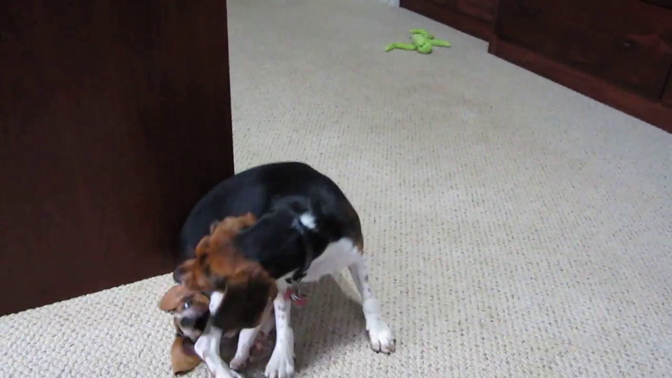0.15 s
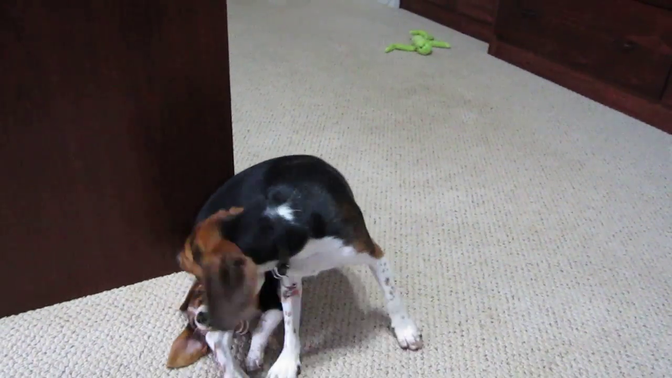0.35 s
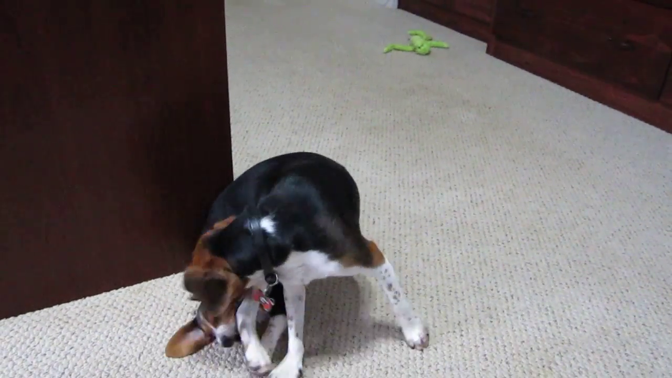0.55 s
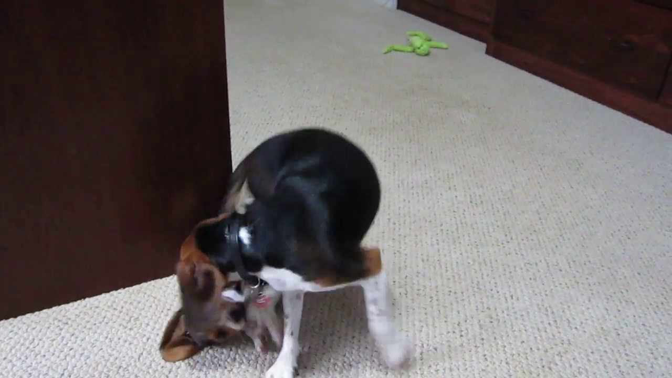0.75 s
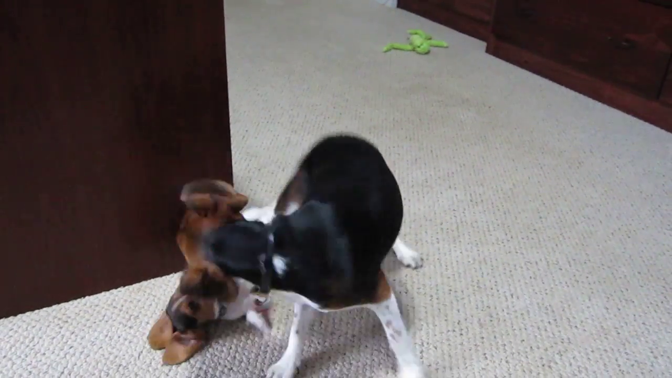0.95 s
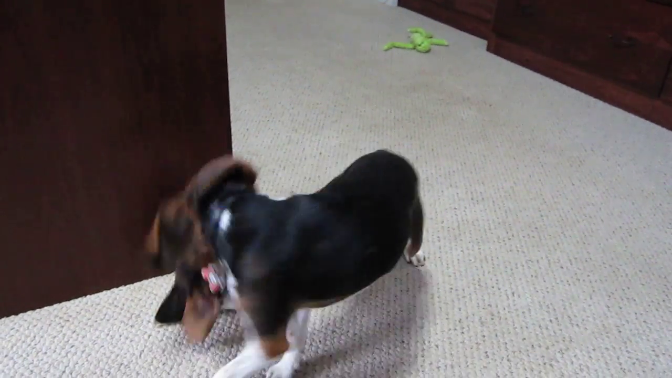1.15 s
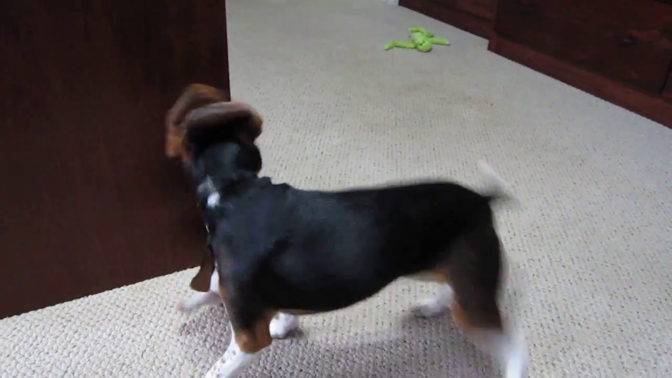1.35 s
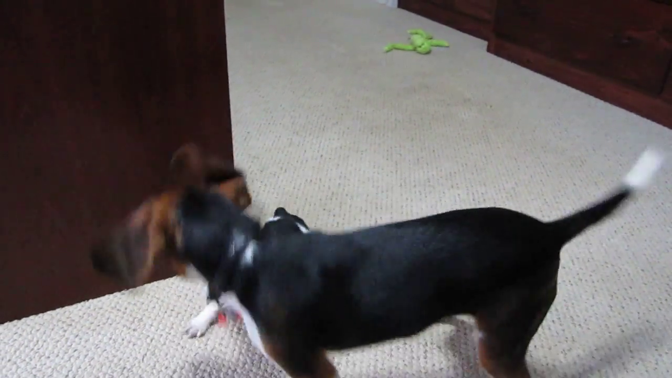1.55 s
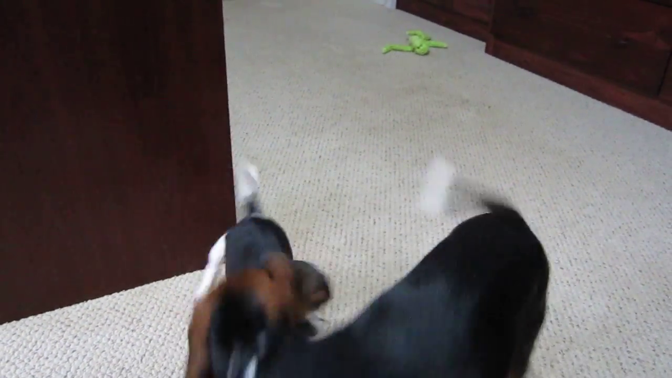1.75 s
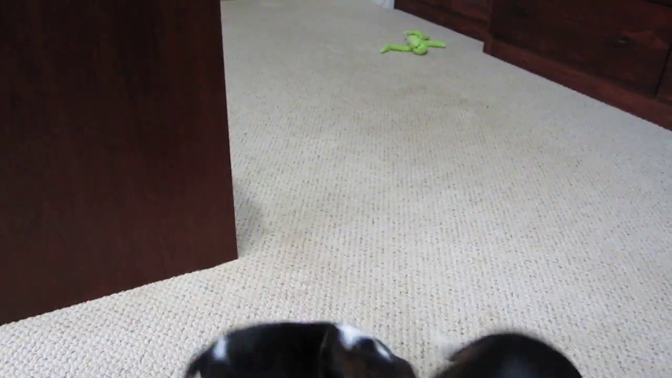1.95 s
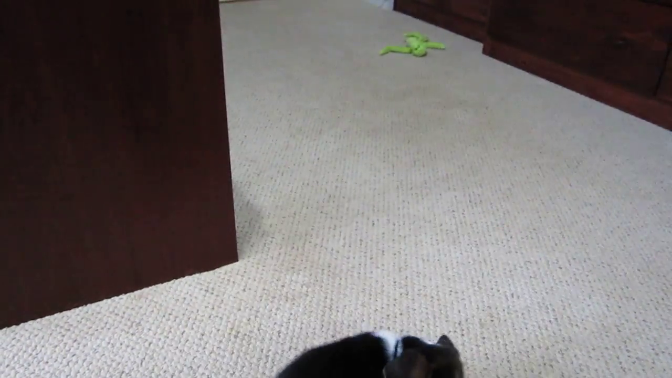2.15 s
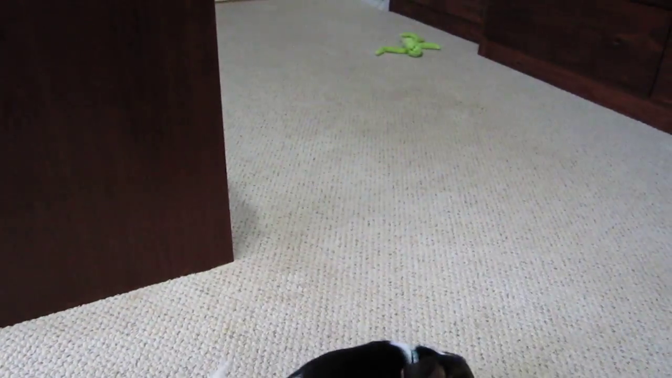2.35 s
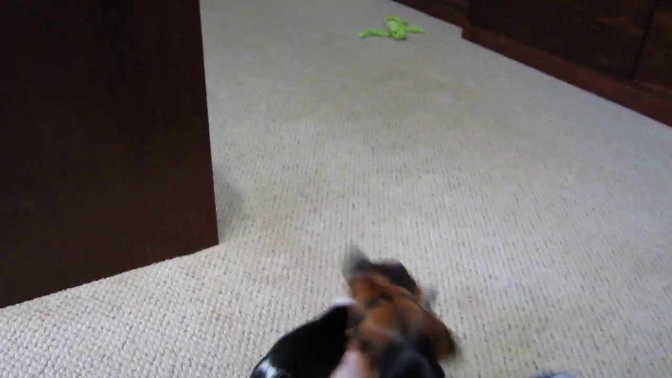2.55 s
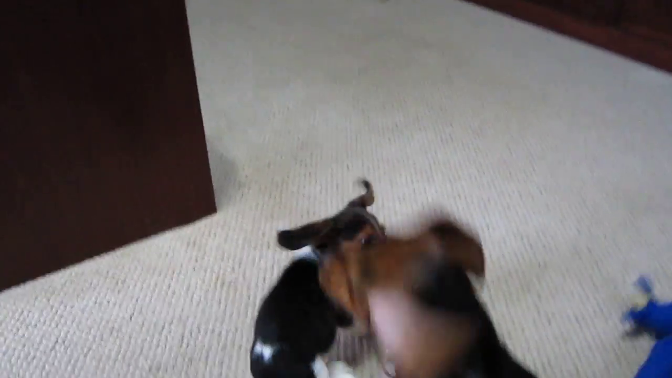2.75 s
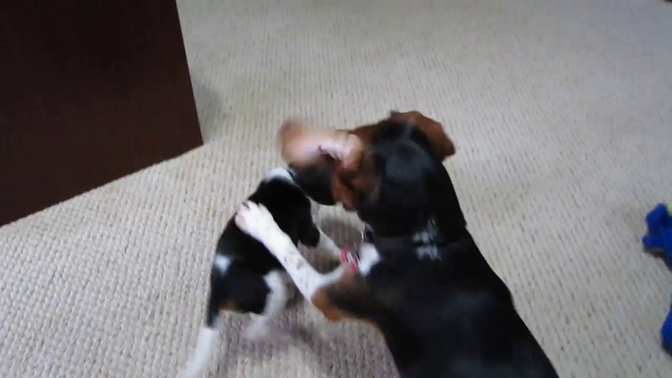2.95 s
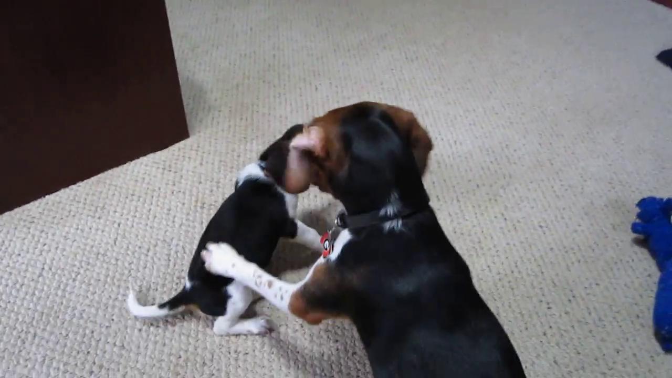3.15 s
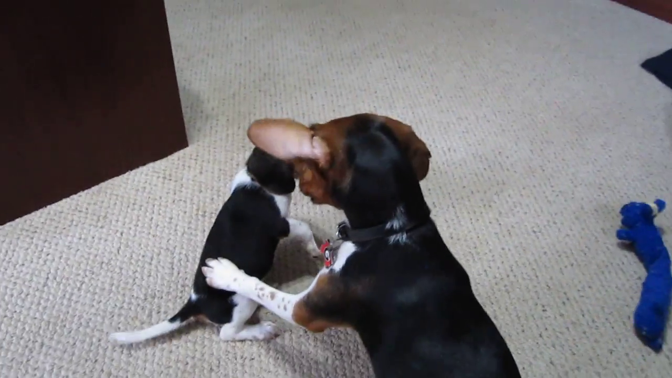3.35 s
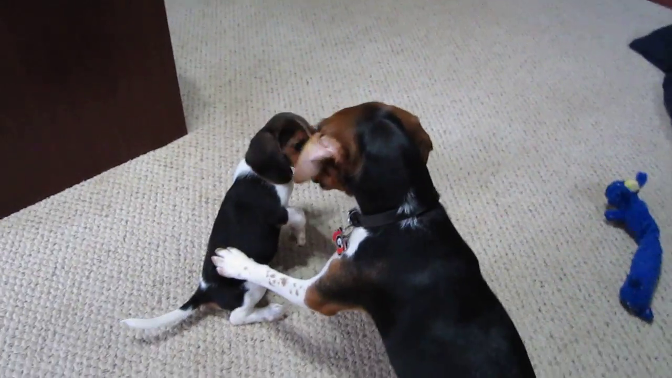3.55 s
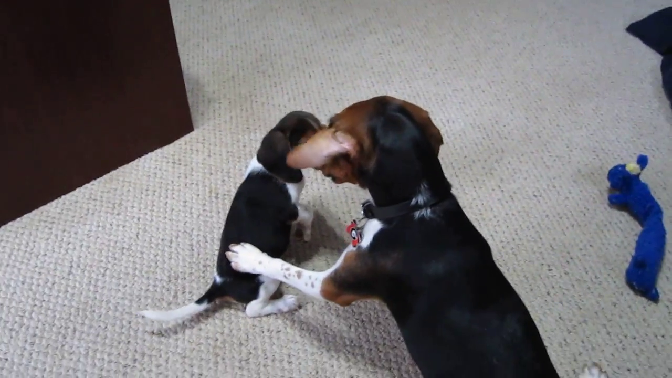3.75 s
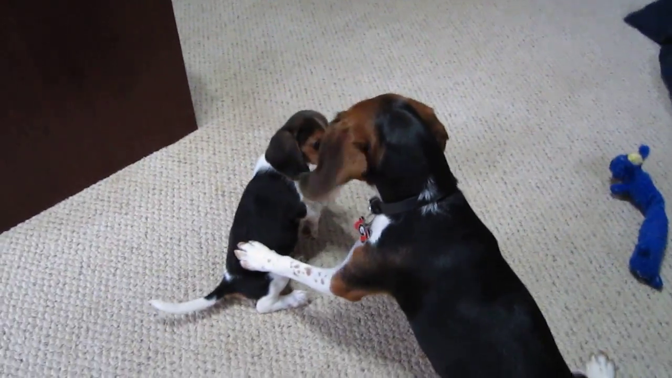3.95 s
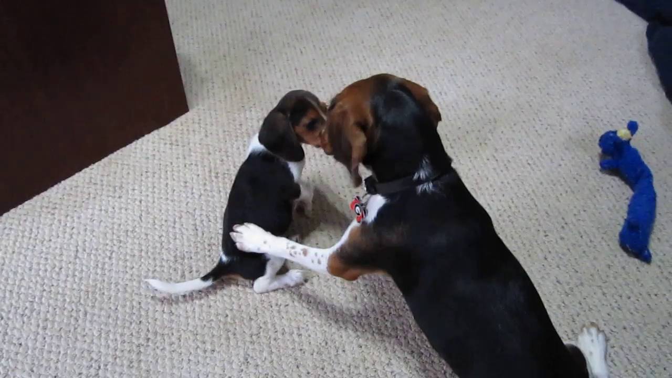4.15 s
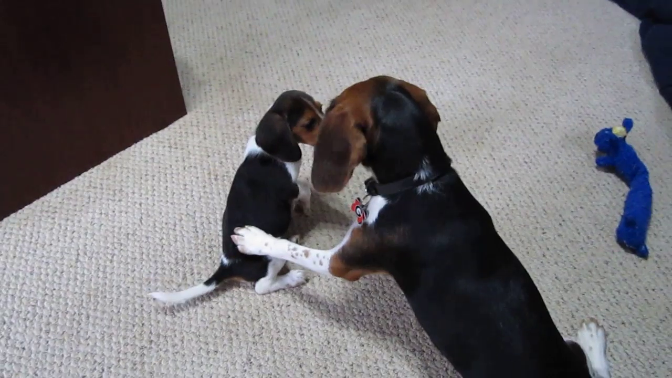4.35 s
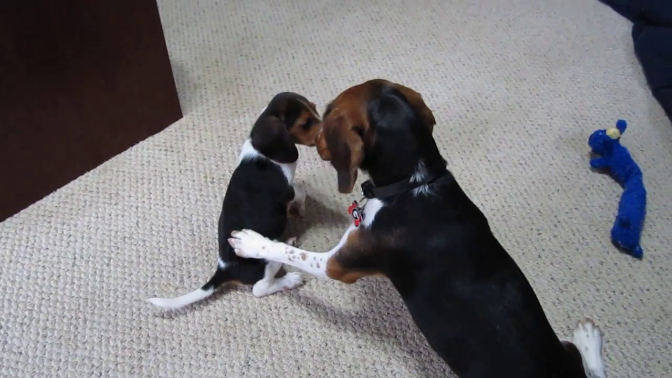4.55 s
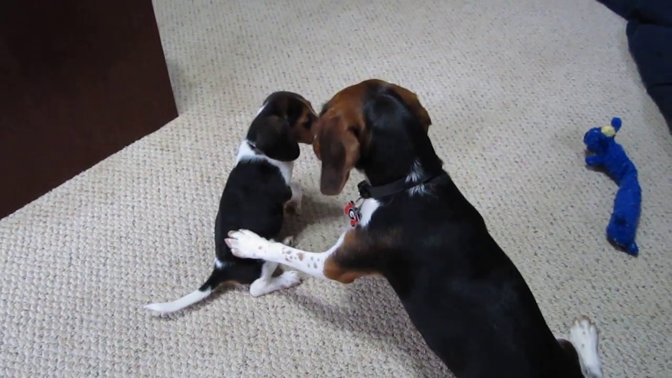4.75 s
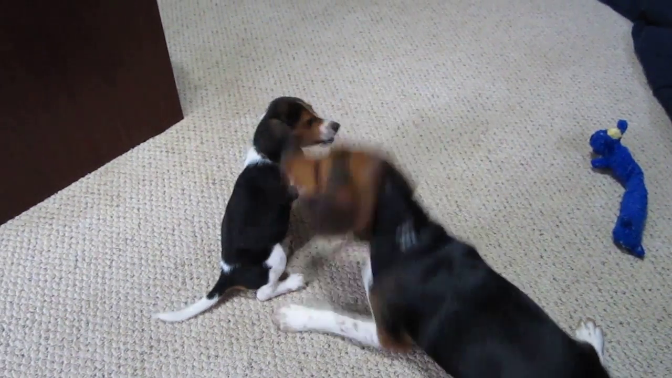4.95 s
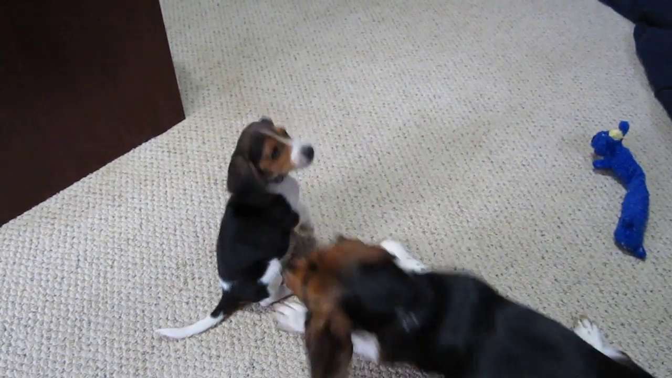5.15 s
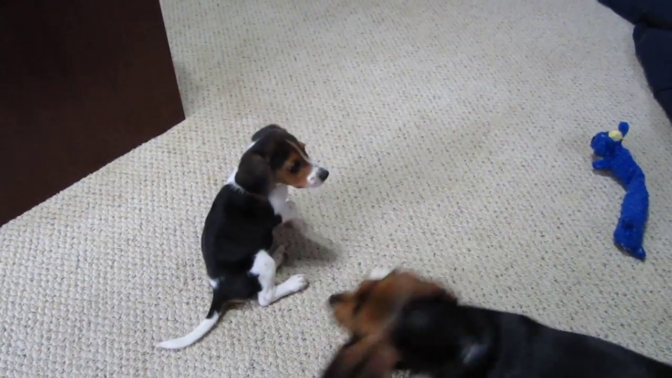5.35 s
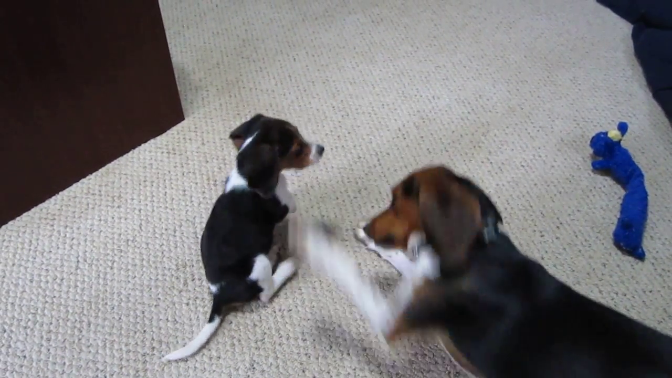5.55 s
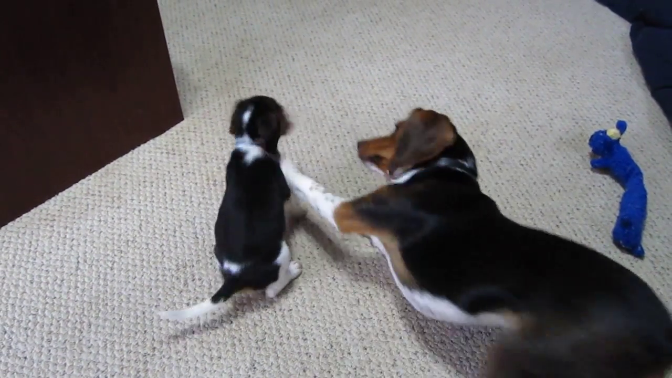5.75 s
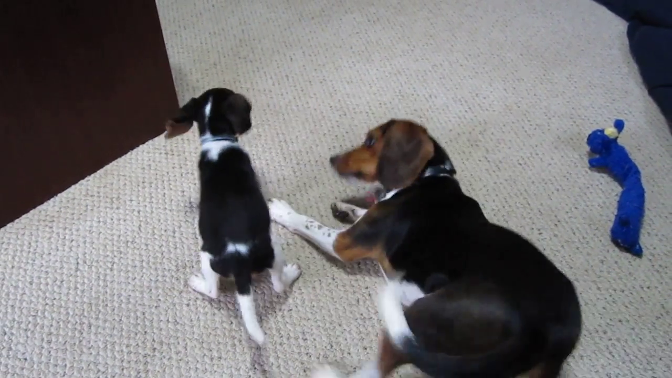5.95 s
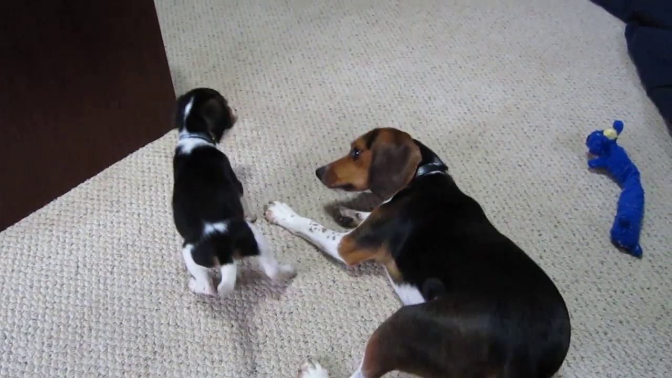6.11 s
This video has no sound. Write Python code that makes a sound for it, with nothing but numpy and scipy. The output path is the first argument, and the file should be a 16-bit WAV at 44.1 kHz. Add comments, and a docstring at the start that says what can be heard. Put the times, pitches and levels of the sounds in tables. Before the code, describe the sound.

A hound and a puppy play-fight on carpet in a small room, heard close with a slight echo. Collar tags clink at the start, and a low, rattling growl runs from 0.2 to 0.9 seconds. From about 1 to 1.8 seconds come short grunts, dull paw thumps, scuffs and jingling metal tags. A loud yap at 1.8 seconds leads into an airy snarl, a falling cry and a yelp, followed by quick high yips around 2.5 seconds. Faint tag clinks and tooth or claw ticks come near 2.9 seconds. From 3 to 4.8 seconds there is only faint room tone and barely audible mouthing. At 4.9 seconds a brief, high squeal lands with a thump, and the tags clink lightly. At 5.2 seconds a bark clears into a short, sinking howl, ending hoarse by 5.6 seconds. A faint nose whistle and a soft scuff follow near 5.9 seconds.

```python
"""A hound growls, grunts and snarls, play-fighting with a puppy on a carpet in a small room; then come
yips, a squeal and a howling bark. The growls are slow, uneven slaps of the vocal folds ringing chest
and mouth; the cries are gliding harmonics that fray into breath. Paws thump and scuff, teeth and claws
tick, and the metal tags of a collar jingle."""
import sys
import numpy as np
from scipy import signal
from scipy.fft import rfft, irfft, next_fast_len
from scipy.io import wavfile
from scipy.ndimage import uniform_filter1d, map_coordinates

SR = 44100
rng = np.random.default_rng(int(sys.argv[2]) if len(sys.argv) > 2 else 0)


def persist_wave(psi):
    """Save psi, clipped to +-1, as 16-bit WAV."""
    counts = np.round(np.clip(psi, -1, 1) * 32767).astype(np.int16)
    wavfile.write(sys.argv[1], SR, np.atleast_2d(counts).T)


N = 272538
TOP_HZ = 16000


def amp(db):
    """Decibels to gain."""
    return 10 ** (np.asarray(db) / 20)


def unit(x):
    """x scaled to rms 1."""
    return x / np.sqrt(np.mean(x ** 2) + 1e-20)


def steady(x):
    """x with its slow swells evened out to rms 1."""
    return x / np.sqrt(np.abs(uniform_filter1d(x ** 2, size=1500)) + 1e-20)


def along(points, hz):
    """(Hz, value) points read at hz on a log axis."""
    freqs, values = np.transpose(points)
    return np.interp(np.log(hz + 1), np.log(freqs + 1), values)


def curves(rows, t=None):
    """One automation curve per column after the time, read at t or from first row to last."""
    times, *columns = np.transpose(rows)
    if t is None:
        t = np.arange(int(times[0] * SR), int(times[-1] * SR)) / SR
    return [np.interp(t, times, column) for column in columns]


def wobble(rate, size):
    """A smooth random curve, rate knots a second."""
    knots = rng.standard_normal(int(size * rate / SR) + 4)
    return map_coordinates(knots, [np.arange(size) * rate / SR])


def filtered(x, response):
    """x through a gain that depends on frequency."""
    size = next_fast_len(len(x) + 8192)
    return irfft(rfft(x, size) * response(np.fft.rfftfreq(size, 1 / SR)), size)[:len(x)]


def coloured(x, colour):
    """x through a (Hz, dB) EQ curve, at rms 1."""
    return unit(filtered(x, lambda hz: amp(along(colour, hz))))


def noise(size, colour):
    """Noise with a (Hz, dB) colour, at rms 1."""
    return coloured(rng.standard_normal(size), colour)


def add(track, start, x):
    """Mix x into the track at start seconds, with softened ends."""
    part = track[round(start * SR):][:len(x)]
    index = np.arange(len(x))
    fades = np.minimum(index / 30, index[::-1] / 250).clip(0, 1)
    part += (x * fades)[:len(part)]


def resonate(x, colour, scale=1):
    """x rings through a minimum-phase (Hz, dB) colour whose frequencies are scaled."""
    size = 2 * next_fast_len(len(x) + SR // 8)
    gain = amp(along(colour, np.fft.rfftfreq(size, 1 / SR) / scale))
    cepstrum = irfft(np.log(gain))
    causal = np.r_[1, np.full(size // 2 - 1, 2), np.zeros(size // 2)]
    return irfft(rfft(x, size) * np.exp(rfft(cepstrum * causal)))[:len(x)]


def early_reflections(x, t60=0.035, db=-3):
    """The door and floor right beside the dogs blur each pulse with quick echoes."""
    t = np.arange(SR // 40) / SR
    echoes = rng.standard_normal(len(t)) * amp(-60 * t / t60)
    return x + amp(db) * signal.fftconvolve(x, echoes / np.linalg.norm(echoes))[:len(x)]


def moving_mouth(x, depth_db=3):
    """Tongue and lips keep moving, so the high resonances of the mouth come and go."""
    hz, _, spectrum = signal.stft(x, SR, nperseg=512)
    drift = uniform_filter1d(rng.standard_normal(spectrum.shape), size=8, axis=0)
    drift = unit(uniform_filter1d(drift, size=16, axis=1))
    highs = np.clip(hz / 2000 - 1, 0, 1)[:, None]
    return signal.istft(spectrum * amp(depth_db * highs * drift), SR, nperseg=512)[1][:len(x)]


def growl(controls, throat, mouth_db, mouth_shut_db, rasp_db, rasp_shut_db, jitter, air, shut_scale,
          chest_db=0, scatter_db=3, tremor_db=1.5):
    """Slow, uneven slaps of the vocal folds, each with a puff of air, ring the chest and the mouth."""
    hz, effort_db, jaw, rough = controls
    size = len(hz)
    cycle = np.cumsum(hz * (1 + jitter * rough * wobble(150, size))) / SR
    pulses = np.diff(np.floor(cycle), prepend=0) * amp(scatter_db * wobble(100, size))
    slaps = unit(early_reflections(pulses))
    puffs = unit(np.exp(-1.5 * (cycle % 1)) * rng.standard_normal(size))
    effort_db = effort_db + tremor_db * wobble(28.2, size)  # the push of the lungs trembles
    strain_db = 0.76 * np.maximum(effort_db + 24, 0)  # rasp breaks out above -24 dB of effort
    chest = (70, 520), chest_db, .7
    mouth = (520, 1600), mouth_db + mouth_shut_db * (1 - jaw), 1.5
    rasp = (1600, 15500), rasp_db + rasp_shut_db * (1 - jaw) + strain_db, 14
    voice = 0
    for band_hz, db, airiness in (chest, mouth, rasp):
        source = slaps + air * airiness * rough * puffs
        # the resonances drop as the jaw closes
        voiced = jaw * resonate(source, throat) + (1 - jaw) * resonate(source, throat, shut_scale)
        bandpass = signal.butter(4, band_hz, "bandpass", fs=SR, output="sos")
        voice = voice + amp(effort_db + db) * steady(signal.sosfilt(bandpass, voiced))
    return moving_mouth(voice)


# Throat colour of the faint and the long growl. Each row: frequency in Hz, gain in dB.
GROWL_THROAT = [(60, -23), (190, -16), (270, 4), (350, -6.5), (490, -21), (640, -4.5), (800, -11.5),
                (990, 5.5), (1110, 12), (1450, -19), (2300, -10.5), (2900, -20.5), (3400, -23), (4100, -30),
                (5000, -29.5), (5900, -31), (6900, -36), (8200, -44), (9700, -43.5), (15000, -58.5)]
# The opening mutter. Each row: time in seconds, pulse rate in Hz, effort in dB, jaw opening 0-1,
# roughness 0-1.
FAINT_GROWL = [(0, 91.2, -56.5, 1, 0.65), (.045, 87.8, -63.5, 1, .5), (.1, 89.5, -78, 0.9, 0.7)]

def faint_growl(out):
    """A low, open-jawed growl dies away as the push of air eases."""
    voice = growl(curves(FAINT_GROWL), GROWL_THROAT, mouth_db=20, mouth_shut_db=-2.5,
                  rasp_db=2.5, rasp_shut_db=-6, jitter=.12, air=.81, shut_scale=.9)
    add(out, FAINT_GROWL[0][0], voice)


# Bright scrape and dark rub. Each row: frequency in Hz, gain in dB.
SCRAPE_EQ = [(600, -23), (1300, -0.5), (2350, 0.5), (3300, -8.5), (5600, -11.5), (8900, -30.5),
             (14000, -39)]
RUB_EQ = [(25, -12.5), (65, 0), (130, -4), (220, -4), (380, -9.5), (1200, -16), (2600, -59.5)]
# Bouts of rubbing and scraping noise. Each row: start and hold in seconds, rub and scrape faders in dB.
RUBS_AND_SCRAPES = [(0, 0.12, -53, -61.5), (.9, 0.16, -38, -48), (.958, 0.021, -30.5, -36),
                    (1.36, 0.071, -35.5, -47.5), (1.495, 0.06, -35, -26.5), (1.795, .02, -39.5, -54.5),
                    (2.415, 0.038, -54, -59.5), (3.45, 0.23, -80, -70), (5.93, 0.062, -52.5, -61.5)]

def rubs_and_scrapes(out, rise_db_per_s=599.5, fall_db_per_s=350):
    """Strokes of dark and bright noise: scuffles on the carpet, and faint mouthing near 3.5 s."""
    t = np.arange(N) / SR
    rub = scrape = 0
    for start, hold, rub_db, scrape_db in RUBS_AND_SCRAPES:
        before, after = np.maximum(start - t, 0), np.maximum(t - start - hold, 0)
        stroke = amp(np.maximum(-rise_db_per_s * before - fall_db_per_s * after, -120))
        rub = np.maximum(rub, amp(rub_db) * stroke)
        scrape = np.maximum(scrape, amp(scrape_db) * stroke)
    grain = rng.standard_normal(N) * amp(2 * wobble(400, N))  # a fast flutter roughens the scrape
    out += amp(-3) * scrape * steady(coloured(grain, SCRAPE_EQ))
    out += amp(-4.5) * rub * noise(N, RUB_EQ)


# Fader ride of the room tone. Each row: time in seconds, level in dB.
ROOM_TONE_RIDE = [(0, -48), (2.3, -61), (3.1, -70.5), (3.6, -65.5), (4.8, -61), (5.2, -61.5), (5.8, -71.5),
                  (6.18, -72)]
# Its dark tilt. Each row: frequency in Hz, gain in dB.
ROOM_TONE_EQ = [(25, 3.5), (217, -2.5), (500, -8), (1160, -9), (8600, -23.5), (16000, -37.5)]

def room_tone():
    """A faint bed of noise sinks and swells under the dogs."""
    level_db, = curves(ROOM_TONE_RIDE, np.arange(N) / SR)
    return amp(level_db) * noise(N, ROOM_TONE_EQ)


def ring(modes, t, scatter_db):
    """A struck object's decaying modes, their strengths scattered afresh for every blow."""
    return sum(amp(db + scatter_db * rng.normal() - 60 * t / t60) * np.sin(2 * np.pi * hz * t)
               for hz, db, t60 in modes)


# Partials of the tags. Each row: frequency in Hz, gain in dB, 60 dB decay time in seconds.
SMALL_TAG_MODES = [(3290, -25.5, .35), (8220, -12.5, 0.077), (9964, -1.5, 0.067), (11510, -4.5, 0.11),
                   (11850, -17, .16), (14740, -16.5, .14)]
LARGE_TAG_MODES = [(3670, 4, 0.21), (8400, -9, 0.085)]
# Jolts of the collar. Each row: start in seconds, fader in dB, large tag and rebound in relative dB.
COLLAR_JOLTS = [(.004, -29.5, -13.5, -2.5), (1.337, -30.5, -26.5, 2), (1.461, -27.5, -1.5, -29),
                (1.634, -40, -23, -26.5), (1.726, -29, -39.5, 1.5), (2.814, -43, -34, -31),
                (2.879, -48, -2.5, -26), (4.999, -40.5, -22.5, 0), (5.192, -47, -7, -23.5)]

def collar_tags(out, rebound_s=.04):
    """Metal tags clash with a crack and a high ring, swing back and clash again."""
    t = np.arange(SR // 2) / SR
    crack_eq = [(1000, -19.5), (5000, 0), (15000, -10)]
    for start, db, large_db, rebound_db in COLLAR_JOLTS:
        for delay, change_db in ((0, 0), (rebound_s, rebound_db)):
            small = ring(SMALL_TAG_MODES, t, scatter_db=5.5)
            large = amp(large_db) * ring(LARGE_TAG_MODES, t, scatter_db=4.5)
            crack = amp(-2.5 - 60 * t / .025) * noise(len(t), crack_eq)
            add(out, start + delay, amp(db + change_db - 5.5) * (small + large + crack))


def hum(controls, jitter=0.035):
    """The clean core of a growl: the second harmonic behind closed lips, the third with the jaw open."""
    hz, effort_db, jaw, rough = controls
    phase = 2 * np.pi * np.cumsum(hz * (1 + jitter * rough * wobble(89, len(hz)))) / SR
    second = amp(15.5 - 22 * jaw) * np.sin(2 * phase)
    third = amp(-2) * jaw ** 2 * np.sin(3 * phase)
    return np.sqrt(2) * amp(effort_db) * (second + third)


# The long growl's moves. Each row: time in seconds, pulse rate in Hz, effort in dB, jaw opening 0-1,
# roughness 0-1.
LONG_GROWL = [(.172, 101.6, -34, 0.93, .4), (0.187, 102.2, -29, 0.29, 0.17), (0.239, 87.1, -31, 1, .1),
              (0.351, 92.8, -23.5, 0.99, .45), (.425, 97.78, -24.5, 0.89, .8),
              (0.441, 102.5, -26, 0.17, 0.37), (0.519, 106, -27, 0.18, .3), (.545, 108.2, -21, .45, .8),
              (.61, 101.5, -29.5, 0.39, .55), (.71, 95.45, -35, 0.41, .4),
              (0.793, 96.15, -26.5, 0.67, 0.59), (0.879, 74, -41.5, 0.66, .75)]

def long_growl(out):
    """The folds rattle over a hum while the jaw opens and closes."""
    controls = curves(LONG_GROWL)
    core = hum(controls)
    rattle = growl(controls, GROWL_THROAT, chest_db=-3.5, mouth_db=1, mouth_shut_db=-9.5,
                   rasp_db=-14, rasp_shut_db=5, jitter=.18, air=.79, shut_scale=.923)
    add(out, LONG_GROWL[0][0], core + rattle)


# Boom of the floorboards. Each row: frequency in Hz, gain in dB, 60 dB decay time in seconds.
FLOOR_MODES = [(70.15, -6.5, 0.39)]
# Dull knock of a paw. Each row: frequency in Hz, gain in dB.
PAW_EQ = [(40, -15.5), (130, -1), (260, -0.5), (450, -10.5), (900, -21.5), (3000, -43)]
# Landings. Each row: start in seconds, fader in dB, boom in relative dB.
THUMPS = [(.954, -23.5, 0.5), (1.356, -23.5, -2.5), (1.378, -24, 4), (1.419, -30, -7.5),
          (1.469, -27.5, -10.5), (1.556, -22, -10.5), (1.799, -23.5, -8), (2.07, -33.5, -5),
          (4.861, -21.5, -22.5), (4.972, -29.5, -15.5)]

def thumps(out, attack_s=0.0013):
    """Paws and bodies land on the carpet, and the boards under it boom."""
    t = np.arange(SR // 2) / SR
    attack = 1 - np.exp(-t / attack_s)
    for start, db, boom_db in THUMPS:
        boom = amp(boom_db) * ring(FLOOR_MODES, t, scatter_db=0)
        knock = amp(-4.5 - 60 * t / 0.056) * noise(len(t), PAW_EQ)
        add(out, start, amp(db + 2) * (boom + knock) * attack)


# Throat colour of the grunts. Each row: frequency in Hz, gain in dB.
GRUNT_THROAT = [(70, -37), (120, -15.5), (210, 4), (400, -13), (620, -13), (1030, -16.5), (1220, -6.5),
                (1600, -13), (2200, -27.5), (4700, -27.5), (9000, -46.5), (15000, -61.5)]
# Grunt cues. Each row: start and length in seconds, pulse rate in Hz, effort in dB, jaw opening 0-1.
GRUNTS = [(1.062, .045, 148.3, -27.5, 0.97), (1.124, .119, 104.3, -28.5, 0.55),
          (1.241, 0.12, 124.6, -38, 0.35), (1.637, .11, 109.5, -32.5, .9), (1.74, 0.11, 115.4, -37, 0.58)]

def grunts(out, attack_s=.02, release_s=.015, sag_db_per_s=69.5, rough=.6):
    """Each grunt is one push at a steady pitch: it swells quickly, sags and stops."""
    for start, length, hz, effort_db, jaw in GRUNTS:
        t = np.arange(int(length * SR)) / SR
        controls = np.full(len(t), hz), effort_db - sag_db_per_s * t, jaw, rough
        gate = np.clip(np.minimum(t / attack_s, (length - t) / release_s), 0, 1)
        voice = growl(controls, GRUNT_THROAT, mouth_db=-1, mouth_shut_db=-16,
                      rasp_db=-10.5, rasp_shut_db=-13.5, jitter=.17, air=.82, shut_scale=.76)
        add(out, start, gate * voice)


def treble(hz, corner_hz=3970):
    """High-pass gain: the range where a cry turns to breath."""
    return hz ** 4 / (hz ** 4 + corner_hz ** 4)


def cry(controls, mouth, jitter=0.06, shimmer_db=4, air=0.85, blur=0.1, breath_db=-4):
    """Harmonics glide through the mouth's resonances; strain shakes the folds and frays the treble."""
    hz, db, rough = controls
    size = len(hz)
    phase = 2 * np.pi * np.cumsum(hz * (1 + jitter * rough * wobble(500, size))) / SR
    # uneven closing of the folds smears the high harmonics first
    phase += blur * np.sqrt(np.abs(rough)) * wobble(900, size)
    harmonic = np.arange(1, 25)[:, None]
    weight = amp(along(mouth, harmonic * hz)) * (harmonic * hz < TOP_HZ)
    fray = np.clip(rough / 0.35, 0, 1)
    partials = weight * (1 - fray * treble(harmonic * hz)) * np.sin(harmonic * phase)
    tone = partials.sum(axis=0) / np.sqrt(np.sum(weight ** 2, axis=0) / 2)
    puffs = (1 + np.cos(phase)) * rng.standard_normal(size)
    hiss = steady(coloured(puffs, mouth))
    tone += amp(breath_db) * fray * filtered(hiss, treble)
    shimmer = amp(shimmer_db * rough * wobble(300, size))
    hiss_mix = np.clip(air * rough, 0, 1)
    return amp(db) * (np.sqrt(1 - hiss_mix ** 2) * tone * shimmer + hiss_mix * hiss)


# Mouth and nose colours of the cries. Each row: frequency in Hz, gain in dB.
YAP_MOUTH = [(250, -32), (480, -17.5), (700, 0), (970, -1), (1420, -17), (1900, -28.5), (2700, -23.5),
             (3600, -36), (8000, -50.5), (15000, -67.5)]
YELP_MOUTH = [(300, -34.5), (500, -8.5), (660, 4.5), (950, -13.5), (1300, -11), (2000, -14), (2700, -13.5),
              (3400, -31), (4300, -46), (7500, -43.5), (15000, -65.5)]
YIP_MOUTH = [(350, -23), (600, -2), (900, 7.5), (1300, -2.5), (1650, -11), (2200, -9.5), (2650, -15.5),
             (3100, -27.5), (4800, -47.5), (8000, -48.5), (15000, -66)]
NOSE = [(2500, -30.5), (5100, -2), (9000, -29.5)]
SQUEAL_MOUTH = [(300, -21.5), (900, -18), (1440, -5), (2100, -13.5), (2880, -22), (4300, -46), (5800, -52),
                (9000, -54.5), (15000, -66)]
CLOSED_MOUTH = [(200, 12), (380, -17), (700, -18), (6000, -52)]
BARK_MOUTH = [(300, -44), (510, 0.5), (780, -5), (1080, 3.5), (1350, -14.5), (1600, -3), (2100, -12.5),
              (2850, -12), (3600, -38.5), (5100, -29), (6300, -44), (8600, -44), (15000, -58)]
# Yaps, yips, a squeal, a bark, moans and nose whistles. Each row: start, rise and fall in seconds,
# pitch at start, turn and end in Hz, glide exponent, level at the turn, swell and fade in dB,
# roughness 0-1, mouth colour.
CRIES = [(1.828, 0.023, .03, 521, 485, 425, 1.26, -11, 10.5, 14.5, .3, YAP_MOUTH),
         (1.912, .028, .15, 1119, 1095, 617, 1.0, -22.5, 8, 7, .62, YAP_MOUTH),
         (2.107, .046, .045, 534, 682.7, 639, 2.0, -15.5, -4.5, 10.5, .22, YELP_MOUTH),
         (2.503, .028, .014, 857, 1038, 1163, 0.86, -18, 7.5, 2, .16, YIP_MOUTH),
         (2.536, .014, .041, 1150, 1326, 559.5, 1.5, -14.5, 6, 6, .42, YIP_MOUTH),
         (2.592, .012, .022, 720, 849.7, 734, 0.93, -17.5, 7.5, 16, .95, YIP_MOUTH),
         (4.832, .012, .01, 4850, 5016, 5150, 1.0, -49.5, 15.5, 16, .12, NOSE),
         (4.869, .042, 0.023, 1384, 1474, 1455, 1.6, -13, 0, 25.5, 0.08, SQUEAL_MOUTH),
         (5.14, .027, 0.067, 184, 262, 410, 0.89, -43.5, 18, 6.5, .2, CLOSED_MOUTH),
         (5.215, .04, .135, 478, 537.8, 513, 1.6, -17, 18, 22.5, .65, BARK_MOUTH),
         (5.565, .013, 0.029, 1148, 925.5, 628, 1.0, -35, 11, 5, .35, YAP_MOUTH),
         (5.565, .02, 0.091, 473.5, 400, 165, 1.0, -49.5, 11.5, 4.5, 0.7, CLOSED_MOUTH),
         (5.89, .025, .03, 5080, 5120, 5470, 1.46, -45, 32, 26, 0.2, NOSE)]

def short_cries(out, attack_s=0.0054, level_bend=1.1, clearing=.5):
    """Pitch and level run to a turning point, where the voice is clearest, and away from it."""
    for start, rise, fall, start_hz, turn_hz, end_hz, bend, db, swell_db, fade_db, rough, mouth in CRIES:
        t = np.arange(int((rise + fall) * SR)) / SR
        rising = t < rise
        away = np.where(rising, 1 - t / rise, (t - rise) / fall)  # 0 at the turn, 1 at both ends
        hz = turn_hz + (np.where(rising, start_hz, end_hz) - turn_hz) * away ** bend
        level_db = db - np.where(rising, swell_db, fade_db) * away ** level_bend
        roughness = rough * (1 - clearing * (1 - away))
        attack = np.minimum(t / attack_s, 1)
        add(out, start, attack * cry((hz, level_db, roughness), mouth))


# Throat colour of the snarl. Each row: frequency in Hz, gain in dB.
SNARL_THROAT = [(120, -30), (270, -10), (420, -17.5), (750, -2.5), (1000, 4), (1200, 0.5), (1500, -16),
                (2150, -1.5), (2700, -28.5), (3900, -22), (4800, -41.5), (6400, -29), (8000, -40.5),
                (15000, -58.5)]
# The snarl's moves. Each row: time in seconds, pulse rate in Hz, effort in dB, jaw opening 0-1,
# roughness 0-1.
SNARL = [(1.885, 200.8, -48, .95, .95), (1.955, 172.1, -28, .95, .6), (1.99, 178.7, -36, .55, .7),
         (2.039, 268.5, -28.5, .35, .35), (2.109, 263.4, -26.5, .1, 0.5)]

def snarl(out):
    """A fast, airy growl, the jaw closing as the pitch rises."""
    voice = growl(curves(SNARL), SNARL_THROAT, mouth_db=10.5, mouth_shut_db=-14,
                  rasp_db=1.5, rasp_shut_db=-13.5, jitter=.25, air=1, shut_scale=.84)
    add(out, SNARL[0][0], voice)


# Tooth and claw hits. Each row: start in seconds, fader in dB.
TICKS = [(2.8679, -45.5), (2.9074, -46), (4.0164, -59), (5.4445, -43), (6.0442, -52)]

def ticks(out, t60=0.03):
    """Teeth and claws make tiny, bright clicks."""
    t = np.arange(SR // 2) / SR
    tick_eq = [(400, -10.5), (1600, 3.5), (5500, -3), (14000, -12.5)]
    for start, db in TICKS:
        add(out, start, amp(db - 6 - 60 * t / t60) * noise(len(t), tick_eq))


# The howl's round vowel. Each row: frequency in Hz, gain in dB.
HOWL_MOUTH = [(350, -36.5), (520, -6), (660, 8), (1180, -31.5), (1780, -22.5), (2400, -39.5), (3000, -41),
              (3700, -70.5), (5300, -52.5), (10000, -67), (15000, -80.5)]
# Its sinking line. Each row: time in seconds, pitch in Hz, level in dB, roughness 0-1.
HOWL = [(5.24, 607.6, -23.5, 0.48), (5.319, 646.4, -20, 0.48), (5.379, 607.6, -16.5, 0),
        (5.437, 597.6, -13, .013), (5.51, 584.8, -18, 0), (5.545, 569.3, -28.5, 0.01),
        (5.579, 536, -27.5, .15), (5.63, 522, -37, 0.6)]

def howl(out):
    """The voice clears into a pure howl as the bark dies, then ends hoarse."""
    add(out, HOWL[0][0], cry(curves(HOWL), HOWL_MOUTH))


# Reverb length. Each row: frequency in Hz, 60 dB decay time in seconds.
REVERB_DECAY = [(150, 0.44), (600, 0.34), (1400, 0.4), (3000, 0.37), (10000, .23)]
# Reverb send. Each row: frequency in Hz, gain in dB.
REVERB_SEND = [(200, -10.5), (600, -6.5), (1200, -6), (3000, -5.5), (10000, -6.5)]

def reverb(x, predelay_s=.007):
    """The walls answer after a few milliseconds; each frequency dies at its own speed."""
    hz, t, spectrum = signal.stft(rng.standard_normal(SR // 2), SR, nperseg=256)
    decay = amp(-60 * t / along(REVERB_DECAY, hz)[:, None])
    energy = np.mean(decay ** 2, axis=1, keepdims=True) * SR / 2
    decay *= amp(along(REVERB_SEND, hz))[:, None] / np.sqrt(energy)
    tail = signal.istft(spectrum * decay, SR, nperseg=256)[1]
    return signal.fftconvolve(x, np.pad(tail, (round(predelay_s * SR), 0)))[:N]


def scene():
    """Both dogs and their foley in the small room, over its tone, in mono."""
    dogs = np.zeros(N)
    for layer in (faint_growl, rubs_and_scrapes, collar_tags, long_growl, thumps, grunts, short_cries,
                  snarl, ticks, howl):
        layer(dogs)
    return (dogs + room_tone() + reverb(dogs))[None]


def record(dry):
    """A brick-wall low-pass on the master."""
    return filtered(dry[0], lambda hz: hz < TOP_HZ)[None]


dry = scene()
out = record(dry)
persist_wave(out)
```